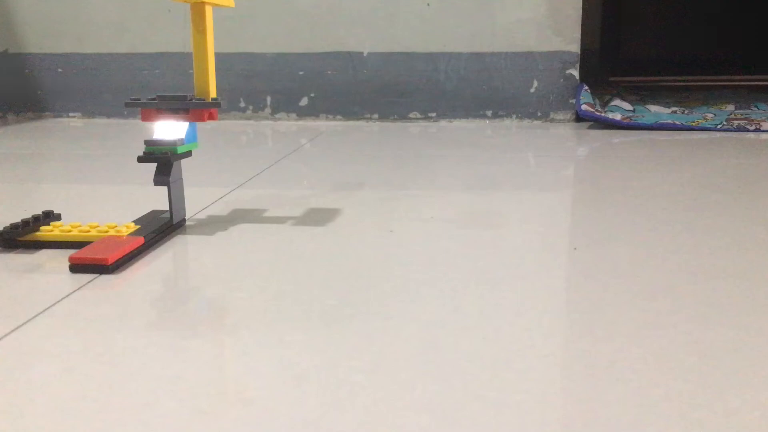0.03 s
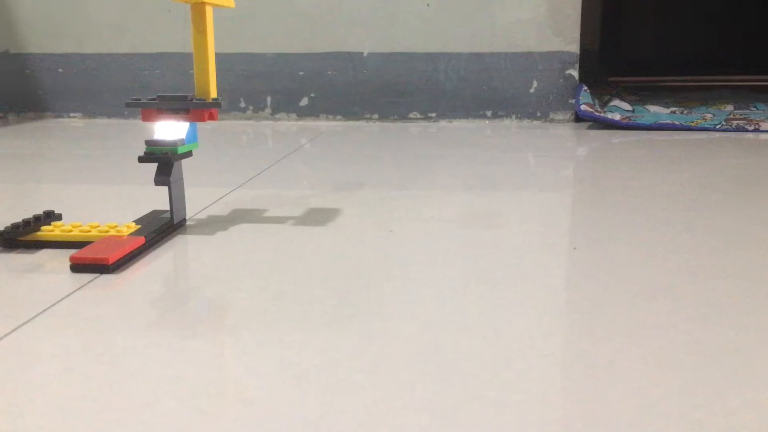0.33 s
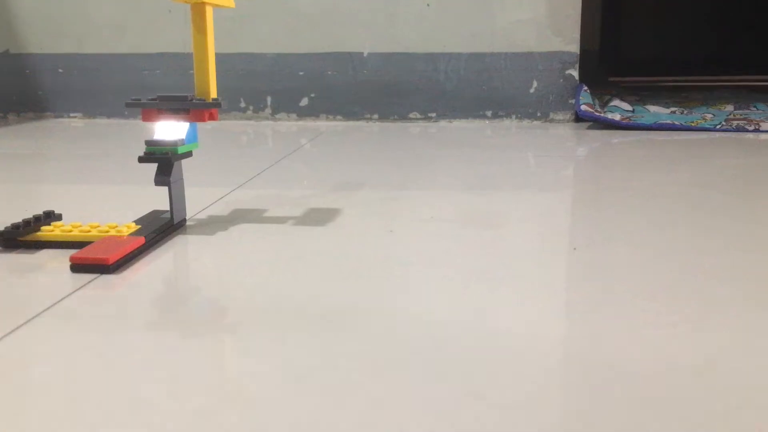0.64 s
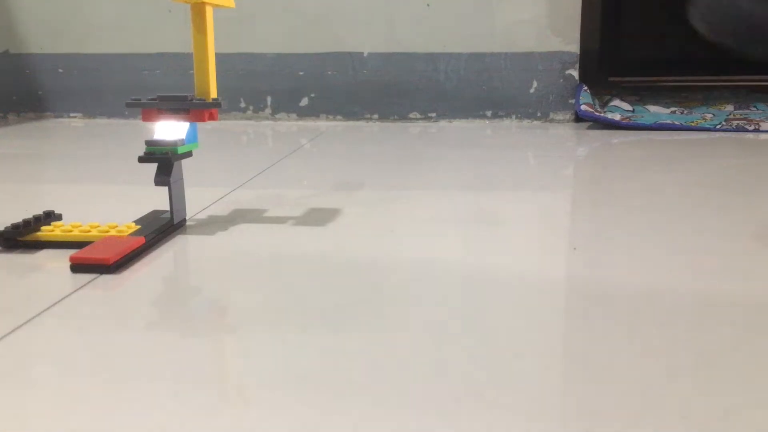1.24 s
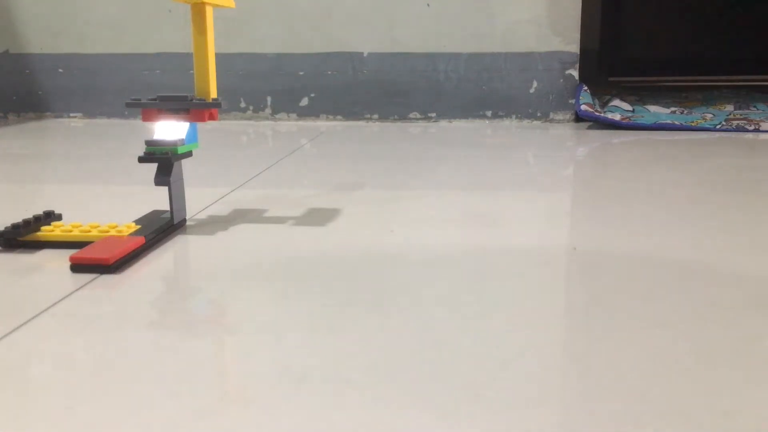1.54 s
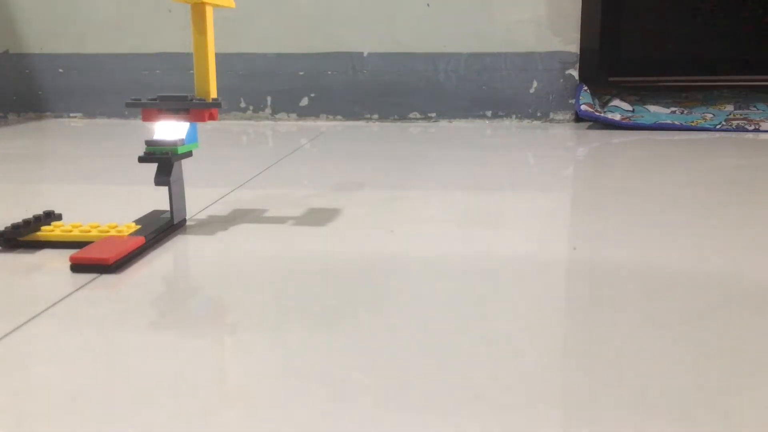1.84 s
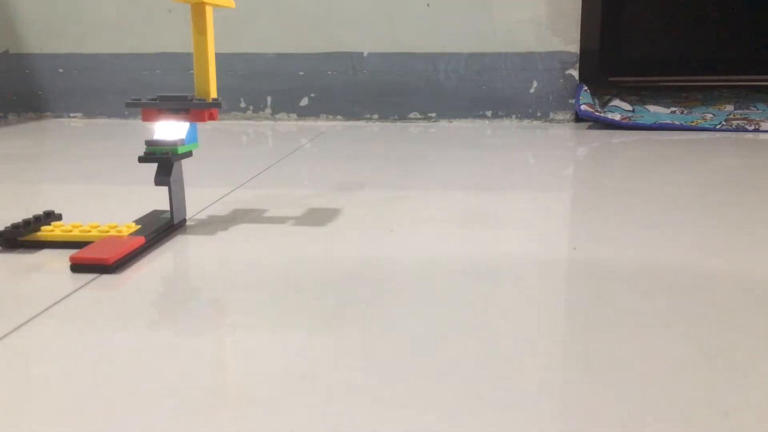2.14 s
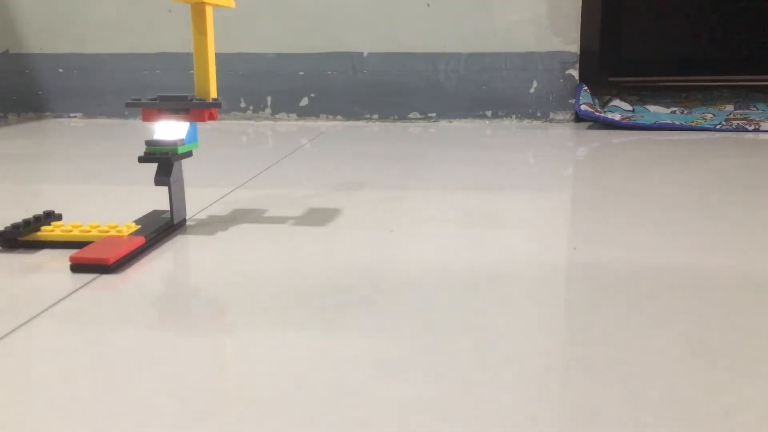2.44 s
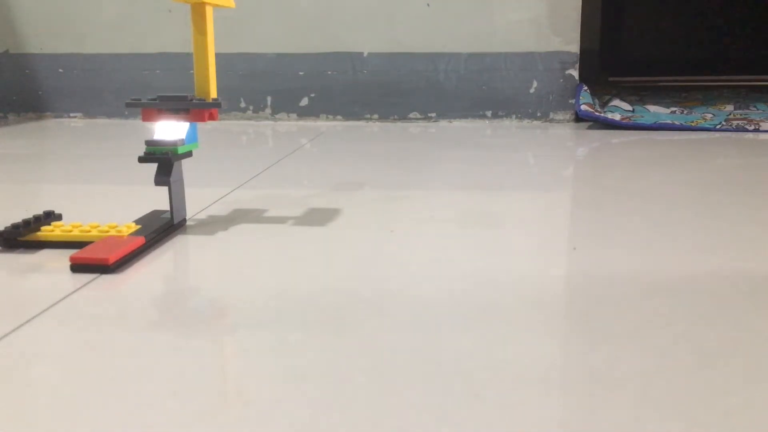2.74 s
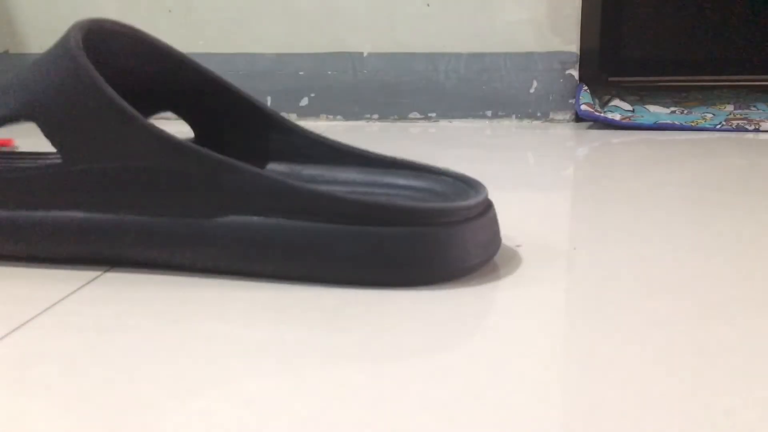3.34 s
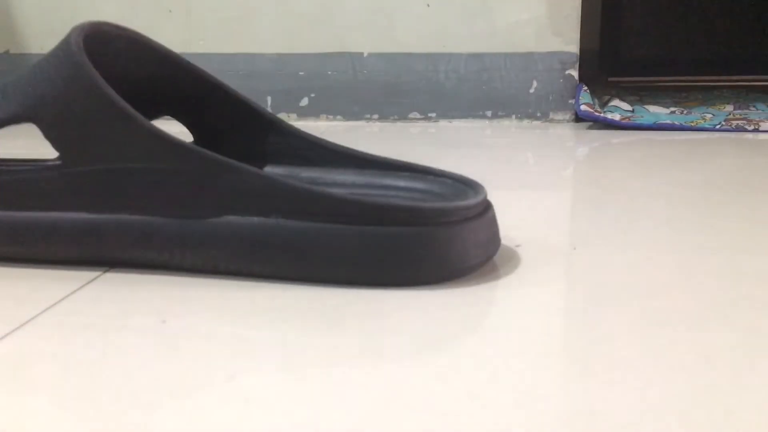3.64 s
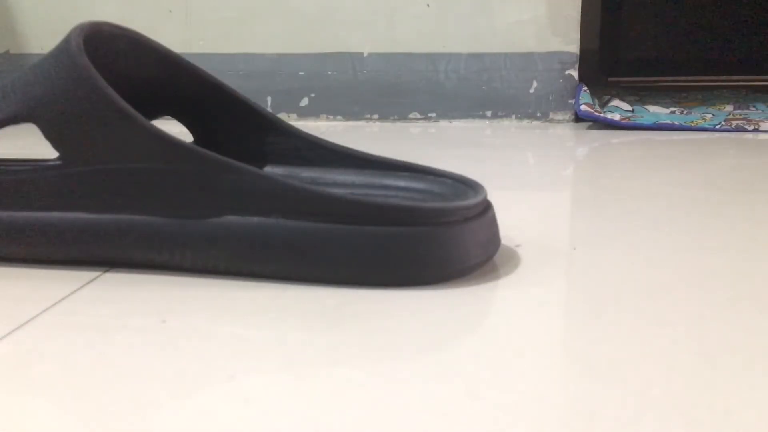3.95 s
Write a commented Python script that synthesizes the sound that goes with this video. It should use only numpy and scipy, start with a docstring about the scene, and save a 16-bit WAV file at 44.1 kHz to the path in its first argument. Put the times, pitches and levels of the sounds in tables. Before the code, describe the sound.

A sharp clatter of toy bricks knocked over by a slipper, after a faint appliance hum.

```python
"""An appliance hums in a bare, quiet room, and a few faint handling taps and scuffs sound further off.
Then a thrown rubber slipper slaps into a small tower of plastic toy bricks on a tiled floor.
The soft sole gives damped slaps and thumps; the hard bricks burst apart in sharp clacks, the base plate
flexes, and one loose brick bounces away, ringing in its high modes. The room reverberates after them."""
import sys
import numpy as np
from scipy import signal
from scipy.fft import rfft, irfft
from scipy.io import wavfile

SR = 44100
rng = np.random.default_rng(int(sys.argv[2]) if len(sys.argv) > 2 else 0)


def unload_audio(sound):
    """Save the sound as a 16-bit wav file, at the path given as the first command line argument."""
    columns = np.transpose(np.atleast_2d(sound))
    # keep every value between -1 and 1, then stretch to whole-number steps
    steps = np.round(np.clip(columns, -1, 1) * 32767)
    wavfile.write(sys.argv[1], SR, steps.astype(np.int16))


N = 176400
TIME = np.arange(N) / SR


# The sole meets tower and tiles. Each row: start in seconds, level in dB, centre frequency in Hz.
SOLE_SLAPS = [(3.0095, -25, 1070), (3.0445, -25, 935), (3.071, -24, 980), (3.0762, -26.5, 556),
              (3.0813, -27.5, 402), (3.0876, -15, 1300), (3.111, -13.5, 1570), (3.1320, -3, 2290),
              (3.1581, -8.5, 1380), (3.1623, -24.5, 480), (3.2592, -33.5, 584)]
# The slipper's weight lands. Each row: start in seconds, level in dB, frequency in Hz.
SOLE_THUMPS = [(3.013, -27.5, 177), (3.048, -27, 198), (3.070, -24, 167), (3.16, -25, 192.3),
               (3.165, -23, 71), (3.262, -38, 202)]

def slipper():
    """Inelastic impact: rubber damps each slap quickly, and its weight lands as a low decaying sine."""
    out, size = np.zeros(N), SR // 4
    for start, db, hz in SOLE_SLAPS:
        slap = knock(hz, octaves=1.48, rattle_db=0.5, t60=0.025)
        add(out, start, from_db(db) * in_room(slap, room_db=-10))
    attack = 1 - np.exp(-TIME[:size] / 0.0014)
    envelope = attack * decay(t60=0.052, size=size)
    for start, db, hz in SOLE_THUMPS:
        add(out, start, -from_db(db) * envelope * np.sin(2 * np.pi * hz * TIME[:size]))
    return out


# Bricks snap apart and hit the tiles. Each row: start in seconds, level in dB, centre frequency in Hz,
# bandwidth in octaves, rattle of the shell in dB relative to the contact pulse.
BRICK_CLACKS = [(3.0108, -20, 7000, 0.64, 3.5), (3.0250, -37, 8000, 1.2, -7), (3.0395, -10, 7200, 1.0, 2.5),
                (3.043, -8.5, 7400, 1.0, -8.5), (3.0553, -20, 11000, 1.5, -1), (3.0872, 3, 6400, 1.63, -2),
                (3.0898, -11, 5500, 2.2, 9.5), (3.0999, -22, 4500, 2.2, 12), (3.1099, 2, 6900, 1.8, -5.5),
                (3.1103, -8, 9000, 1.6, 10), (3.1284, -16, 4500, 2.4, -9), (3.1322, -0.5, 9000, 1.5, -4),
                (3.1394, -6.5, 11400, .8, 7.5), (3.1475, -29, 2720, .8, -5), (3.1475, -5, 11800, 0.24, -11),
                (3.1921, -13, 4000, 2.4, -2), (3.2136, -5, 4750, 2, -10), (3.2167, -36, 7000, 1.6, -4),
                (3.2282, -21, 5500, 2.0, -5.5), (3.2335, -21.5, 7000, 1.6, 8), (3.243, -21, 12500, .5, 0),
                (3.244, -18, 2800, 1.4, -9), (3.351, -18, 9000, 1.4, 7), (3.3522, -9, 10500, 1.5, 6.5),
                (3.3581, -8, 9900, 1.5, 9.5), (3.3592, -0.5, 6300, 1.2, -7), (3.4215, -12.5, 6000, 2.4, 0),
                (3.4233, -42, 10860, 1.5, -4), (3.4514, -22, 7900, 2.0, 11.5), (3.51, -27, 7100, 1.5, 8.5),
                (3.609, -38, 6360, 0.095, 3), (3.658, -43, 6600, 0.12, 6)]

def clatter():
    """Hard impact: a brief contact excites high frequencies, in a different band for each clack."""
    out = np.zeros(N)
    for start, db, hz, octaves, rattle_db in BRICK_CLACKS:
        clack = knock(hz, octaves, rattle_db, t60=0.026)
        add(out, start, from_db(db) * in_room(clack, room_db=-5.5))
    return out


# One brick bounces away. Each row: start in seconds, level in dB.
BRICK_BOUNCES = [(3.1228, -16.5), (3.1490, -34), (3.1815, -28), (3.1906, -44.5), (3.215, -26), (3.266, -29),
                 (3.2815, -38), (3.307, -28), (3.3368, -28.5), (3.371, -27), (3.3920, -30), (3.4270, -36),
                 (3.4670, -35), (3.5050, -40)]
# Its resonances. Each row: frequency in Hz, relative level in dB, 60 dB decay time in seconds.
LOOSE_BRICK_MODES = [(5600, -13, 0.044), (5710, 0.5, 0.056), (5980, -6.5, 0.046), (8900, -17, .02),
                     (13000, -3, .04), (13000, -14, .035)]

def loose_brick():
    """Free vibration: a small, stiff brick rings in its high modes after every bounce."""
    return struck_body(BRICK_BOUNCES, LOOSE_BRICK_MODES, room_db=-4)


# Blows on the long base plate. Each row: start in seconds, level in dB.
PLATE_STRIKES = [(3.0872, -43), (3.1104, -28), (3.1320, -24.5), (3.1455, -33), (3.1903, -31), (3.2445, -48)]
# Its resonances. Each row: frequency in Hz, relative level in dB, 60 dB decay time in seconds.
BENDING_MODES = [(1270, -6, 0.012), (1746, -10, 0.069), (2384, -6, 0.0567), (2517, -5, 0.055),
                 (2705, -8.5, 0.087), (3030, -4, 0.04)]

def base_plate():
    """Flexural vibration: the long plate bends when struck and rings lower than a single brick."""
    return struck_body(PLATE_STRIKES, BENDING_MODES, room_db=-1)


# Distant taps. Each row: start in seconds, level in dB, centre frequency in Hz, bandwidth in octaves.
HANDLING_TAPS = [(0.058, -45, 3500, 2.0), (.067, -39, 5000, 1.8), (0.109, -37.5, 2300, 2.7),
                 (0.162, -44, 4000, 1.6), (0.213, -37, 12000, 1.3), (.230, -36, 10900, 1.1),
                 (.255, -39, 1300, 1.1), (.362, -34.5, 1500, 0.59), (.4885, -29.5, 3200, 0.94),
                 (0.559, -31, 3100, 1.3), (.567, -30, 1880, 2), (.654, -42, 9000, 1.5),
                 (0.717, -28, 3500, 1.1), (.724, -33, 590, 3), (0.9539, -31, 3330, 0.7)]
# The handled object. Each row: frequency in Hz, relative level in dB, 60 dB decay time in seconds.
OBJECT_MODES = [(2090, -12, 0.027), (3320, -18, 0.022), (3580, -15, 0.025), (4470, -15, 0.024)]

def handling():
    """Selective excitation: a tap on a hard object favours the modes near its own centre frequency."""
    out = np.zeros(N)
    rattle_db, fall_db_per_octave = 4.5, 2
    for start, db, hz, octaves in HANDLING_TAPS:
        excited = [(mode_hz, mode_db - fall_db_per_octave * abs(np.log2(mode_hz / hz)), t60)
                   for mode_hz, mode_db, t60 in OBJECT_MODES]
        contact = from_db(-rattle_db / 2) * knock(hz, octaves, rattle_db, t60=0.044)
        add(out, start, from_db(db) * in_room(contact + ring(excited), room_db=-1))
    return out


# Soft rubs and rustles. Each row: midpoint in seconds, length in seconds, rms level at the midpoint
# in dB, centre frequency in Hz, bandwidth in octaves.
RUBS = [(0.112, 0.17, -55.5, 1800, 2.5), (0.704, 0.084, -49, 460, 0.77), (0.703, 0.047, -49, 1280, 0.33),
        (1.13, 0.1, -53.5, 353, 0.23), (2.935, .025, -61, 11000, 1.0)]

def scuffs():
    """Friction noise: each rub is a band of noise that swells and fades."""
    out = np.zeros(N)
    for middle, length, db, hz, octaves in RUBS:
        half_band = 2 ** (octaves / 2)
        rub = signal.sosfilt(bandpass(2, hz / half_band, hz * half_band), rng.standard_normal(N))
        out += from_db(db) * rub / rub.std() * swell(middle, length)
    return out


# Rushing air. Each row: frequency in Hz, relative spectral density in dB.
AIR_SPECTRUM = [(15, -60), (25, -39), (49, -7.5), (92, -4), (114, -5), (190, -7.5), (277, -14.5),
                (309, -9.5), (405, -17), (503, -16.5), (734, -18.5), (796, -25), (887, -20), (962, -15.5),
                (1440, -23), (2160, -21.5), (2610, -25), (5730, -35.5), (16000, -55)]
# The motor's tones. Each row: frequency in Hz, rms level in dB, standard deviation of the level in dB.
MOTOR_TONES = [(63, -57, 4.5), (123.1, -53, 3), (160, -61, 3), (188.3, -55.5, 1.5), (248.7, -62, 4),
               (307, -63, 0.5), (496.3, -67, 5), (822.4, -59, 2), (940, -65.5, 1), (2178, -72, 5.5)]
# A brief low drone: midpoint in seconds, length in seconds, frequency in Hz, highest rms level in dB.
DRONE = (2.26, .12, 187, -46)

def appliance():
    """Superposition: broadband air noise lies under a motor's wavering tones and one brief drone."""
    air_db, waver_rate_hz, wander_hz = -46.5, 2.79, 1.426
    air_gain = from_db(at_hz(AIR_SPECTRUM, np.fft.rfftfreq(N, 1 / SR)))
    air = irfft(rfft(rng.standard_normal(N)) * air_gain, N)
    out = from_db(air_db) * air / air.std()
    for hz, db, waver_db in MOTOR_TONES:
        phase = 2 * np.pi * np.cumsum(hz + wander_hz * drift(waver_rate_hz)) / SR
        out += np.sqrt(2) * from_db(db + waver_db * drift(waver_rate_hz)) * np.sin(phase)
    middle, length, hz, db = DRONE
    return out + np.sqrt(2) * from_db(db) * swell(middle, length) * np.sin(2 * np.pi * hz * TIME)


# The bare room. Each row: frequency in Hz, reverberation time in seconds, relative level in dB.
ROOM_BANDS = [(100, 0.57, 4.5), (500, .55, -9), (1200, 0.6, -1), (2480, 0.23, 8.5), (4500, 1, 0),
              (6030, 0.74, 3), (9100, 0.66, 3.5), (11000, 0.64, 0), (12000, 0.87, 2), (15500, 0.47, 5)]

def room_response(size=36000, frame=512):
    """Reverberation: early reflections off floor and walls, then a diffuse tail dying band by band."""
    hz = np.fft.rfftfreq(frame, 1 / SR)[:, None]
    seconds = np.arange(0, size + frame, frame // 2) / SR
    gain = from_db(at_hz(ROOM_BANDS, hz, column=2)) * np.exp(-np.log(1000) * seconds / at_hz(ROOM_BANDS, hz))
    tail = signal.istft(gain * np.exp(2j * np.pi * rng.random(gain.shape)))[1][:size]
    early = rng.standard_normal(size) * decay(t60=0.11, size=size)
    build_up = 1 - np.exp(-(TIME[:size] / 0.0075) ** 2)
    return unit_energy(unit_energy(tail * build_up) + from_db(-0.5) * unit_energy(early * build_up))


def in_room(sound, room_db):
    """Convolution: the direct sound plus its reverberation, with a new response for every spot."""
    heard = from_db(room_db) * signal.fftconvolve(sound, room_response())
    heard[:len(sound)] += sound
    return heard


def knock(hz, octaves, rattle_db, t60, size=6000):
    """Impact transient: a contact pulse, then dense, fast-dying modes as noise, both in one band."""
    attack = np.minimum(TIME[:size] / 0.0005, 1) ** 2
    force = from_db(rattle_db) * unit_energy(rng.standard_normal(size) * decay(t60, size) * attack)
    force[0] = 1  # the contact pulse
    half_band = 2 ** (max(octaves, .1) / 2)
    low, high = hz / half_band, hz * half_band
    band = np.vstack([bandpass(1, low, high), bandpass(2, low / 2, high * 2)])
    pulse_peak = np.abs(signal.sosfilt(band, signal.unit_impulse(size // 10))).max()
    return signal.sosfilt(band, force) / pulse_peak


def ring(modes, size=6000, detune=.011):
    """Modal synthesis: one strike is a sum of damped sines, each slightly detuned at random."""
    out = np.zeros(size)
    for hz, db, t60 in modes:
        shifted_hz = hz * (1 + detune * rng.uniform(-0.83, 1))
        out += from_db(db) * decay(t60, size) * np.sin(2 * np.pi * shifted_hz * TIME[:size])
    return out


def struck_body(hits, modes, room_db):
    """Repeated excitation: every hit rings the body's modes into the room."""
    out = np.zeros(N)
    for start, db in hits:
        add(out, start, from_db(db) * in_room(ring(modes), room_db))
    return out


def drift(hz):
    """Low-passed noise with a standard deviation of one."""
    slow = irfft(rfft(rng.standard_normal(N)) / (1 + (np.fft.rfftfreq(N, 1 / SR) / hz) ** 2), N)
    return slow / slow.std()


def decay(t60, size):
    """Exponential decay of 60 dB in t60 seconds."""
    return np.exp(-np.log(1000) * TIME[:size] / t60)


def swell(middle, length):
    """A bell-shaped envelope of height one."""
    return np.exp(-2 * ((TIME - middle) / length) ** 2)


def bandpass(order, low_hz, high_hz):
    """A band-pass filter, its top edge held below half the sample rate."""
    return signal.butter(order, [low_hz, min(high_hz, .45 * SR)], "band", fs=SR, output="sos")


def at_hz(points, hz, column=1):
    """Interpolate a table's column on a log-frequency axis."""
    table = np.array(points)
    return np.interp(np.log(hz + 1e-9), np.log(table[:, 0]), table[:, column])


def from_db(db):
    """Decibels to gain."""
    return 10 ** (np.asarray(db) / 20)


def unit_energy(x):
    """Scale so that the squares sum to one."""
    return x / np.sqrt(np.sum(x ** 2) + 1e-20)


def add(out, start, sound):
    """Mix a sound in at a start time in seconds."""
    i = int(start * SR)
    out[i:i + len(sound)] += sound[:N - i]


def scene():
    """Superposition: slipper, bricks and background sum in one channel."""
    background = appliance() + scuffs() + handling()
    bricks = clatter() + loose_brick() + base_plate()
    return (slipper() + bricks + background)[None]


def record(dry):
    """Band limiting and saturation: the microphone opens, softens both band edges and rounds peaks."""
    opens_s, cutoff_hz = .0355, 15780
    coloured = signal.sosfilt(bandpass(2, low_hz=32, high_hz=15000), dry * (TIME >= opens_s))
    steep_lowpass = signal.ellip(10, .2, 80, cutoff_hz, fs=SR, output="sos")
    return signal.sosfilt(steep_lowpass, np.tanh(coloured))


dry = scene()
out = record(dry)
unload_audio(out)
```